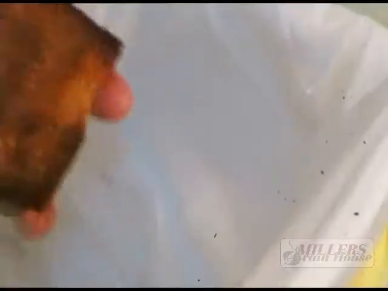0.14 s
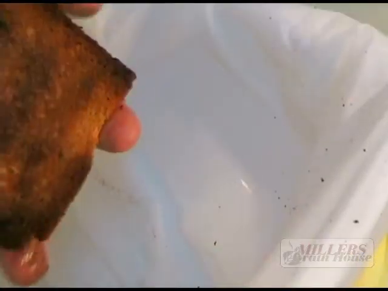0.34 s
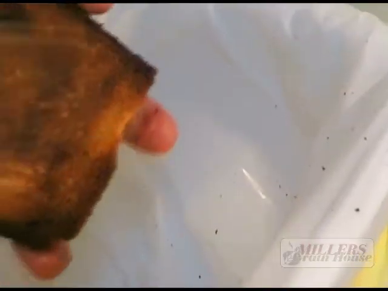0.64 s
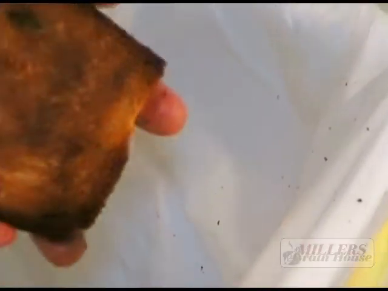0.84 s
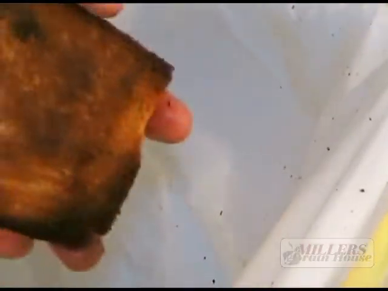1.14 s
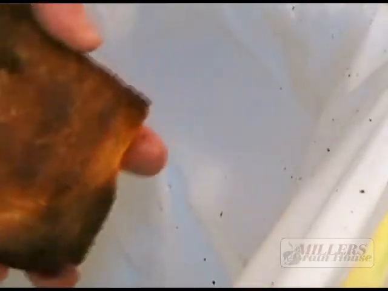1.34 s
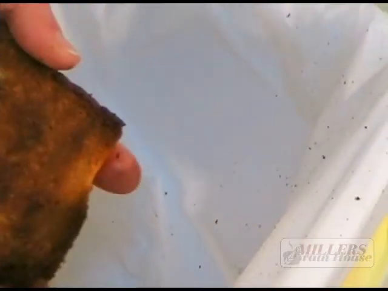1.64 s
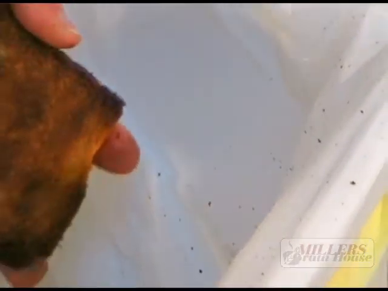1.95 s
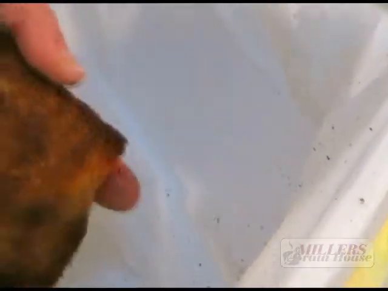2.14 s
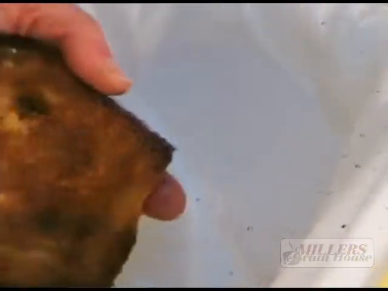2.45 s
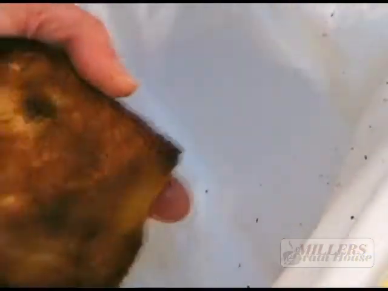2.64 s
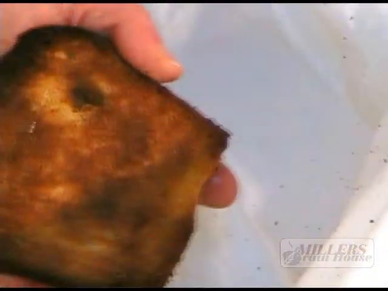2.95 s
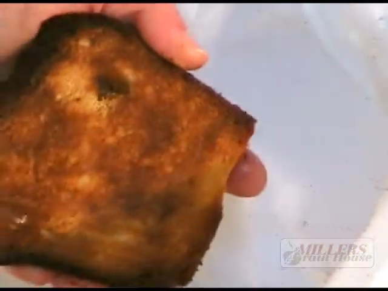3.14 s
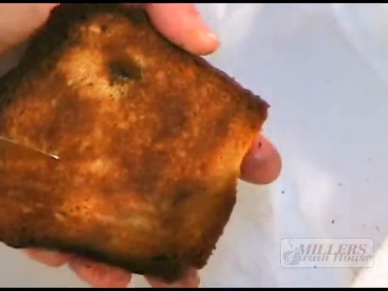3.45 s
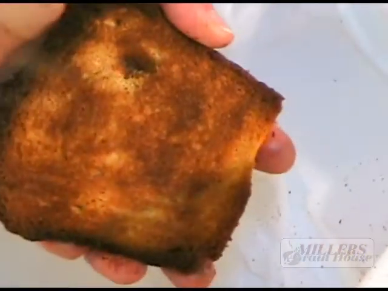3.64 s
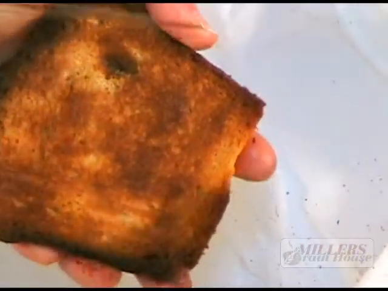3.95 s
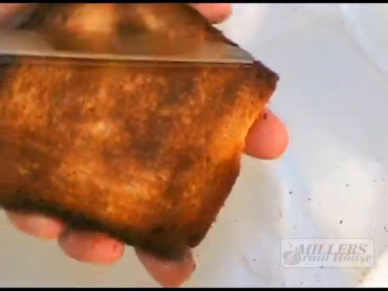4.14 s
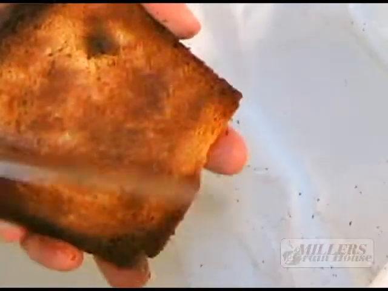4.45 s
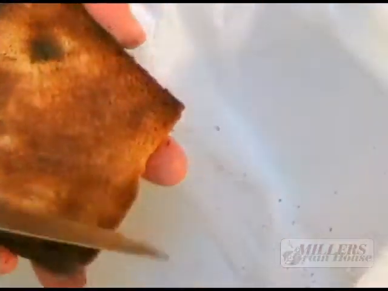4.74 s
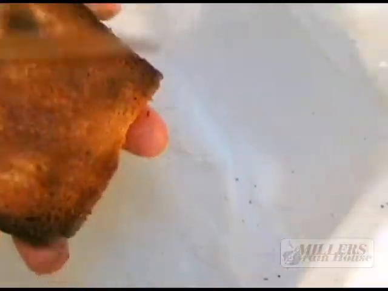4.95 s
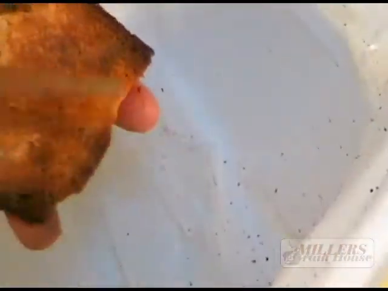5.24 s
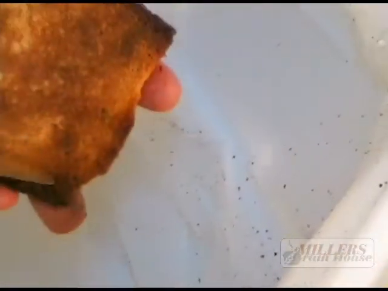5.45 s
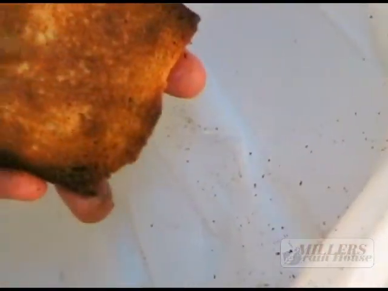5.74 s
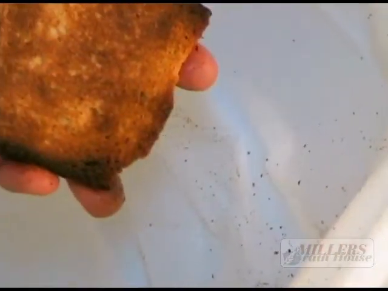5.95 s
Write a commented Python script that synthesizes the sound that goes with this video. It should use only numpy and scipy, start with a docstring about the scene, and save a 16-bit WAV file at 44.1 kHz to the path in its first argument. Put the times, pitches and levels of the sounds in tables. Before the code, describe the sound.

Quick dry scratches of a blade on hard, charred bread, gritty and sharp with a thin metallic edge and a hollow crusty ring. They begin lightly, settle into a brisk regular rhythm, then turn to heavier, more widely spaced scrapes that distort slightly at their loudest. Tiny ticks of the blade touching the crust mark many strokes. Close microphone in a small, lightly echoing kitchen, with quiet air and a low electrical hum behind.

```python
"""A butter knife scrapes burnt toast in quick strokes over a basin, close to a microphone.
Random fractures of the crust form a dense crackle, which excites modes of the steel blade and the stiff slice;
single ticks are short bursts of the same crackle, and two soft knocks are decaying sines.
A small kitchen returns the scraping as decaying sparse echoes; behind it lie filtered-noise air and an
appliance's hum. The loudest moments overload the microphone input."""
import sys
import numpy as np
from scipy import signal
from scipy.io import wavfile
from scipy.ndimage import uniform_filter1d

SR = 44100
rng = np.random.default_rng(int(sys.argv[2]) if len(sys.argv) > 2 else 0)


def persist_wave(psi):
    """Save psi, clipped to +-1, as 16-bit WAV."""
    counts = np.round(np.clip(psi, -1, 1) * 32767).astype(np.int16)
    wavfile.write(sys.argv[1], SR, np.atleast_2d(counts).T)


N = 269046

# Pressure of each stroke: start t/s, rise t/s, sweep t/s, relative level/dB at touch, at bite, at lift;
# then mid-stroke level/dB relative to the pressure: blade tip, blade middle, hard crust, crust, whole slice
STROKE_PRESSURES = [ (0.0, 0.042, 0.003, -36.5, -11.5, -18, 5, -2, -32, -30, -47),
                    (0.66, 0.044, 0.082, -41.5, -19.5, -8.5, 3.8, -2.5, -7, 6, -17),
                    (1.0623, 0.041, 0.07, -24, -7.5, -15, 5.8, 2, -5.5, 1.5, -13),
                    (1.3451, 0.014, 0.056, -28, -8.5, -16, 6.7, 1.5, -8, -3, -8.5),
                    (1.595, 0.018, 0.058, -28, -13, -14.5, 7.5, 1, -10, -7.5, -7),
                    (1.845, 0.0049, 0.098, -30, -27, -19.5, 6, 0.5, -23, -0.5, -10.5),
                    (2.133, 0.018, 0.054, -31, -12, -14.5, 5.8, -1.5, -32, -6.5, -9),
                    (2.41, .032, 0.048, -29, -8, -8.5, 6.6, 3, -9, -4.5, -8.5),
                    (2.707, .032, 0.047, -21.5, -8.5, -7, 8.4, 1, -12, -12, -6),
                    (2.992, 0.039, 0.029, -25, -4, -9.5, 8.8, -4, -16, -7.5, -8),
                    (3.2691, 0.037, 0.038, -35.5, -9, -9, 8.5, 1, -4, 0, -2),
                    (3.567, 0.021, 0.024, -19, -10, -8.5, 7.6, 1.5, -11, -0.5, -1.5),
                    (3.837, 0.019, 0.042, -34, -11, -7, 5.8, 2.5, -25, 1, -8),
                    (4.245, 0.059, 0.065, -33, -9, -12, 8.6, -4, -5.5, 5.5, -2),
                    (4.651, 0.027, 0.058, -38, -12, -8.5, 9.3, -0.5, 1, 2, -6.5),
                    (5.0466, 0.025, 0.064, -33, -9, -6, 8.2, -3, 0, 1.5, -6.5),
                    (5.431, 0.038, 0.068, -28.5, -8.5, -10.5, 6.5, -8, 2.5, 2, -4),
                    (5.81, 0.055, 0.024, -33.5, -11.5, -6, 10.8, -5, -3, 0.5, 2.5), ]
# Gain from touch to lift, level/dB: tip, middle, hard crust, crust, slice;
# row 0 for the first strokes, row 1 once the blade is laid right across the slice
TRAVEL_GAINS = [
    [5.2, -2.1, -6, -13.5, 8],
    [1, -1, -0.5, -14, -9],
]
LAID_ACROSS_S = 4.1
LIFT_DB_PER_S = -330  # the blade leaves the crust
RISE_BEND = 0.88  # exponent below 1: the pressure level rises quickly at first

# Blade touches or landing crumbs: t/s, relative onset level/dB, t60/s,
# extra ring of crust and slice, level/dB (0 a usual touch, more = fuller)
TOUCH_TICKS = [(0.025, -24, 0.035, -8), (0.035, -13, .03, -13), (0.2794, -34, .04, 2),
               (0.3044, -36, .04, 2), (0.631, -24, 0.13, 12), (0.6596, -18, 0.054, 0),
               (0.686, -7.5, .035, 7), (1.063, -15, 0.061, -9), (1.3454, -14, 0.041, -8),
               (1.595, -10, .05, 7), (1.844, -9, 0.068, -5), (1.8991, -20, .04, 2),
               (2.1337, -15, 0.035, 10), (2.4097, -17, .03, 0), (2.4201, -8, 0.044, 1),
               (2.683, -18, 0.2, 8), (2.9943, -14, .05, 9), (3.269, -15, .04, 0),
               (3.538, -11.5, 0.17, 12.5), (3.5668, -8, .06, 2), (3.8306, -9.5, 0.031, 10),
               (3.8484, 1, .04, 4), (4.2434, -5.5, 0.098, -5), (4.6511, -6.5, .05, 10),
               (5.0467, -6.5, 0.056, 9), (5.4306, -5.5, 0.065, -2), (5.5963, -6, 0.075, -2),
               (5.808, -13, 0.045, 11)]
# Share of a tick in each part, level/dB: edge, tip, middle, hard crust, crust, slice
TICK_SHARES = [-12., -4.5, -19, -45, -26.5, -18]

BREAKS_PER_S = 9000  # mean rate of crust fractures
# Crackle spectrum: f/Hz, relative level/dB
CRACKLE_SPECTRUM = [(40, 6), (150, -4), (400, -2), (720, -2.5), (1150, 7), (1550, -3), (2200, 9),
                    (3500, 10), (6000, 10), (9500, 10.5), (12500, 2.5), (15400, -3.5)]
# Hiss of fine dust off the tip: f/Hz, relative spectral level/dB (per Hz)
TIP_HISS_SPECTRUM = [(7000, -25), (9500, -6), (11500, -3), (13000, 0), (15400, -1)]

# Modes of blade and toast: f/Hz, width f/Hz, relative level/dB
EDGE_MODES = [(3810, 160, -13), (6360, 140, -12), (6980, 200, -9), (8250, 120, -14), (8800, 200, -10)]
BLADE_MIDDLE_MODES = [(4400, 300, -7), (5290, 130, -8), (5480, 140, -11)]
BLADE_TIP_MODES = [(10370, 80, -12.5), (11100, 170, -14), (12330, 240, -8.5), (13700, 220, -11),
                   (14850, 260, -11)]
HARD_CRUST_MODES = [(2840, 80, -12), (3000, 70, -8), (3100, 180, -9)]
CRUST_MODES = [(1760, 40, -17), (1960, 110, -9), (2250, 150, -5), (2370, 50, -13), (2500, 70, -11)]
SLICE_MODES = [(945, 38, -8), (1035, 70, -13), (560, 90, -21)]

# Soft knocks: t/s, f/Hz, decay level/dB at t before the soft start, t60/s
SOFT_KNOCKS = [(6.007, 214, -25, 0.11), (6.05, 63, -29, .3)]
# Reverberation of the kitchen: f/Hz, t60/s
ROOM_DECAY = [(250, 0.54), (660, 0.58), (1740, 0.53), (4590, 0.41), (12100, 0.25)]
# Room air spectrum: f/Hz, relative level/dB
AIR_SPECTRUM = [(20, -8), (60, -7), (150, -9), (300, -9), (600, -10.5), (1200, -17.5), (2500, -22),
                (5000, -25.5), (10000, -26.5), (15400, -24.5)]
AIR_DB = -44  # rms level of the air
# Appliance tones: f/Hz, width f/Hz, rms level/dB; the first is the mains hum, a sine (its width is unused)
APPLIANCE_TONES = [(59.2, 1.5, -44), (215, 16, -48), (377, 12, -59), (441.4, 4, -55), (882.9, 4, -56),
                   (1766, 5, -69)]
MIC_EDGE_HZ, BAND_LIMIT_HZ = 15430, 16300  # input filter, final band limit


def scrape():
    """Source and resonators: one fracture force excites broad crackle, dust hiss and the modes of each part."""
    edge, tip, middle, hard_crust, crust, bread = contact()
    dust = tip * rng.choice([-1., 1.], N)  # random signs: fine dust off the thin tip
    crackle = gain_of(4) * coloured(edge, CRACKLE_SPECTRUM)
    hiss = gain_of(-4) * coloured(dust, TIP_HISS_SPECTRUM)
    blade = body(edge, EDGE_MODES) + body(middle, BLADE_MIDDLE_MODES) + body(tip, BLADE_TIP_MODES)
    toast = body(hard_crust, HARD_CRUST_MODES) + body(crust, CRUST_MODES) + body(bread, SLICE_MODES)
    return crackle + hiss + blade + toast


def contact():
    """Amplitude modulation: stroke pressure and tick decay scale the fractures that drive each of six parts."""
    t = np.arange(N) / SR
    force = np.zeros((6, N))
    crumbs = breaks()
    for start, rise, sweep, touch_db, bite_db, lift_db, *rings_db in STROKE_PRESSURES:
        span = slice(round(start * SR), round((start + rise + sweep + .3) * SR))
        u = np.maximum(t[span] - start, 0)
        rising_db = (touch_db - bite_db) * (1 - np.minimum(u / rise, 1) ** RISE_BEND)
        sweeping_db = (lift_db - bite_db) * np.clip((u - rise) / max(sweep, 1e-3), 0, 1)
        lifting_db = LIFT_DB_PER_S * np.maximum(u - rise - sweep, 0)
        pressure_db = bite_db + rising_db + sweeping_db + lifting_db
        along = np.minimum(u / (rise + sweep), 1)  # 0 at touch, 1 at lift
        travel_db = [0, *TRAVEL_GAINS[int(start > LAID_ACROSS_S)]]
        parts_db = np.array([0, *rings_db])[:, None] + np.outer(travel_db, along - .5)
        force[:, span] += gain_of(pressure_db + parts_db)
    for start, onset_db, t60, full_db in TOUCH_TICKS:
        burst = (t >= start) * gain_of(onset_db - 60 * np.maximum(t - start, 0) / t60)
        shares_db = TICK_SHARES + full_db * np.array([0, 0, 0, 0, 1, 1])
        force += burst * gain_of(shares_db)[:, None]
        crumbs[int(np.ceil(start * SR))] = gain_of(17)  # each tick opens with one hard snap
    return force * crumbs


def breaks():
    """Random impulse process: tiny fractures, a few large, clump as the edge catches and slips."""
    size = gain_of(2.41 * np.minimum(rng.exponential(1, N), 5))
    signed = size * rng.choice([-1., 1.], N)
    clicks = signed * (rng.random(N) < BREAKS_PER_S / SR)
    clumping_db = 1.5 * drift(.003) + .7 * drift(.012)
    return evened(clicks * gain_of(clumping_db))


def body(force, modes):
    """Modal superposition: each mode is struck better or worse as the contact point travels."""
    out = np.zeros(N)
    for hz, width, db in modes:
        coupling = gain_of(1.5 * drift(.03))
        out += gain_of(db) * ring(force * coupling, hz, width)
    return out


def ring(x, hz, width):
    """Damped resonance: one pole pair, scaled so that white noise of rms 1 comes out at rms 1."""
    pole = np.exp((2j * hz - width) * np.pi / SR)
    scale = np.sqrt((1 - abs(pole) ** 4) / 4)
    return scale * signal.lfilter([1, 0, -1], np.poly([pole, pole.conj()]).real, x)


def coloured(x, spectrum):
    """Minimum-phase filtering: the log gain fixes the phase of a causal filter of unit energy."""
    level_db = read(spectrum, abs(np.fft.fftfreq(4096, 1 / SR)))
    log_gain = np.log(gain_of(np.maximum(level_db, -100)))
    phase = -signal.hilbert(log_gain).imag
    taps = np.fft.ifft(np.exp(log_gain + 1j * phase)).real[:2048]
    return signal.oaconvolve(x, taps / np.linalg.norm(taps))[:len(x)]


def drift(seconds):
    """Smoothed noise: two moving averages of the given length leave a slow random curve of rms 1."""
    step = 64  # samples between curve points
    wide = max(round(seconds * SR / step), 1)
    noise = rng.standard_normal(N // step + 2)
    slow = uniform_filter1d(uniform_filter1d(noise, wide), wide)
    return np.interp(np.arange(N) / step, np.arange(len(slow)), evened(slow))


def read(points, hz):
    """Linear interpolation of a (f/Hz, value) table over logarithmic frequency."""
    f, value = np.transpose(points)
    return np.interp(np.log(hz + 1), np.log(f + 1), value)


def gain_of(db):
    """Level law: amplitude ratio from decibels."""
    return 10 ** (np.asarray(db) / 20)


def evened(x):
    """Power normalisation: scales to rms 1."""
    return x / np.sqrt(np.mean(x ** 2) + 1e-20)


def thumps():
    """Damped oscillation: each dull knock is an exponentially decaying sine with a soft start."""
    t = np.arange(N) / SR
    out = np.zeros(N)
    for start, hz, db, t60 in SOFT_KNOCKS:
        u = np.maximum(t - start, 0)
        decay = gain_of(db - 60 * u / t60)
        soft_start = 1 - np.exp(-u * hz / 1.1)
        out += decay * soft_start * np.sin(2 * np.pi * hz * u)
    return out


def kitchen(x):
    """Reverberation: sparse echoes of random sign decay at a rate set by frequency."""
    taps = np.zeros((3, SR))
    # one echo somewhere in every 10 samples, after an initial gap of 200
    at = np.arange(200, SR - 10, 10) + rng.integers(0, 10, (3, (SR - 201) // 10))
    np.put_along_axis(taps, at, rng.choice([-1., 1.], at.shape), 1)
    hz, t, z = signal.stft(taps, SR, nperseg=256)
    decay = gain_of(-60 * t / read(ROOM_DECAY, hz)[:, None])
    tails = signal.istft(z * decay, SR, nperseg=256)[1]
    # the hands move, so three tails take turns, 7 cycles a second
    cycles = 7 * np.arange(N) / SR + np.arange(3)[:, None] / 3
    turn = np.cos(2 * np.pi * cycles) * np.sqrt(2 / 3)
    return signal.fftconvolve(x * turn, tails / np.linalg.norm(tails[0]), axes=1)[:, :N].sum(0)


def background():
    """Stationary noise and tones: coloured air, a hum of wavering level, and narrow bands of noise."""
    air = gain_of(AIR_DB) * evened(coloured(rng.standard_normal(N), AIR_SPECTRUM))
    hum_hz, _, hum_db = APPLIANCE_TONES[0]
    waver_db = 1.2 * drift(.1)
    hum = np.sqrt(2) * np.sin(2 * np.pi * hum_hz * np.arange(N) / SR) * gain_of(hum_db + waver_db)
    out = air + hum
    for hz, width, db in APPLIANCE_TONES[1:]:
        out += gain_of(db) * evened(ring(rng.standard_normal(N), hz, width))
    return out


def scene():
    """Superposition: direct scraping, its reverberation, the knocks and the background add."""
    knife = scrape()
    direct = gain_of(-6.5) * knife
    reverberant = gain_of(-17) * kitchen(knife)
    return (direct + reverberant + thumps() + background())[None]


def low_pass(x, hz):
    """Linear-phase filtering: a windowed sinc gives a steep band limit."""
    taps = signal.firwin(511, hz, window=("kaiser", 9), fs=SR)
    return signal.oaconvolve(x, taps[None], "same")


def record(dry):
    """Saturation: the preamplifier overloads, the input filter's overshoots clip at full scale."""
    overloaded = np.clip(dry, -.87, .87)
    full_scale = np.clip(low_pass(overloaded, MIC_EDGE_HZ), -1, 1)
    return low_pass(full_scale, BAND_LIMIT_HZ)


dry = scene()
out = record(dry)
persist_wave(out)
```